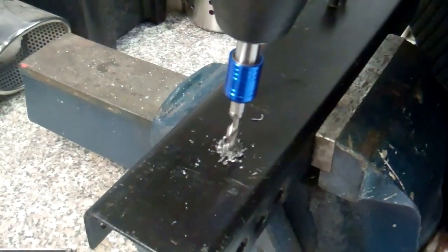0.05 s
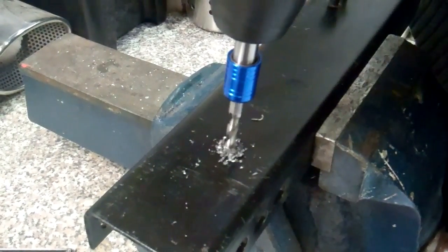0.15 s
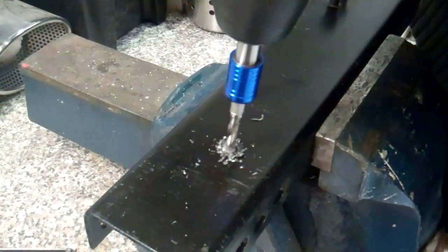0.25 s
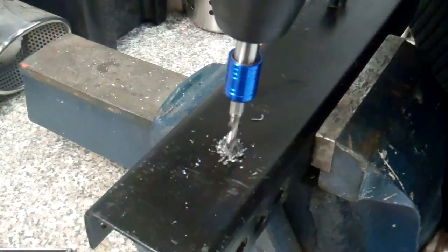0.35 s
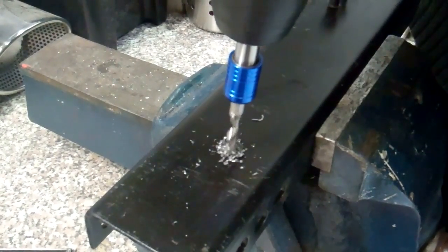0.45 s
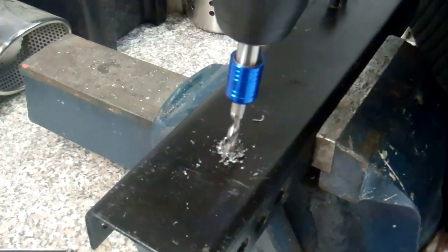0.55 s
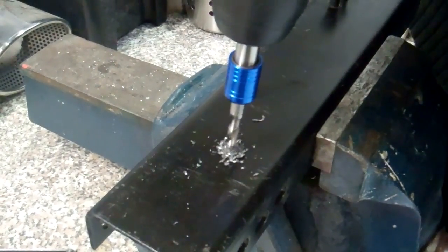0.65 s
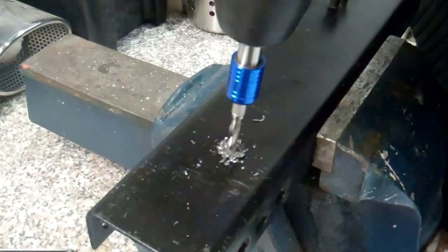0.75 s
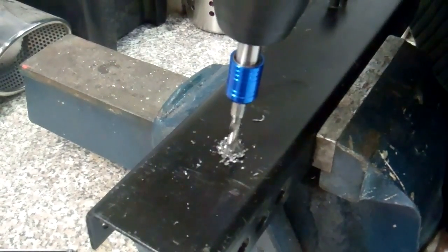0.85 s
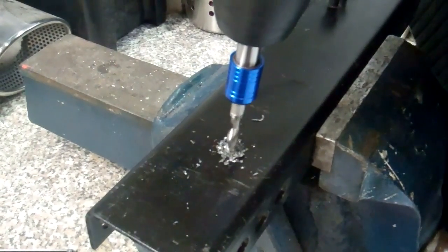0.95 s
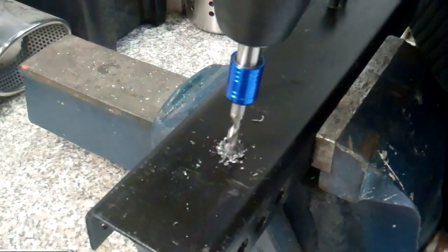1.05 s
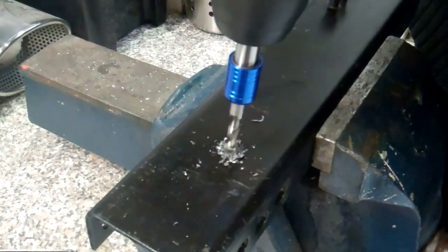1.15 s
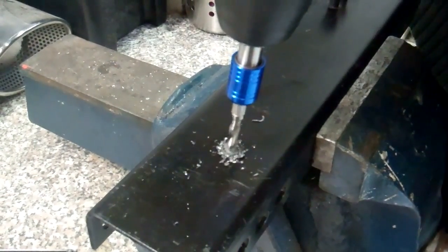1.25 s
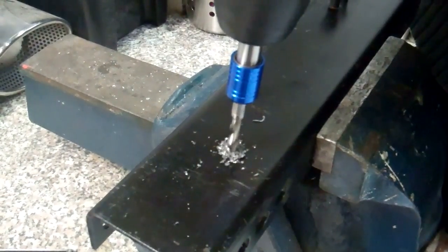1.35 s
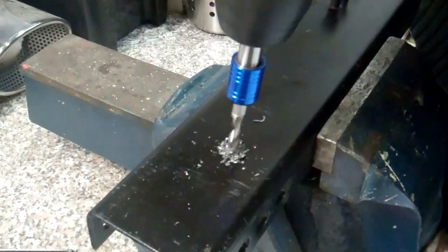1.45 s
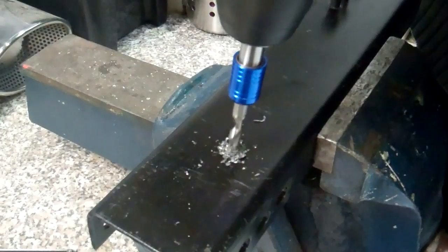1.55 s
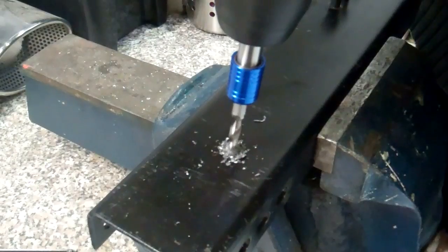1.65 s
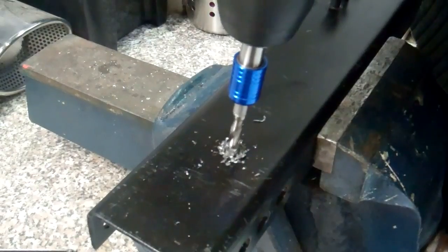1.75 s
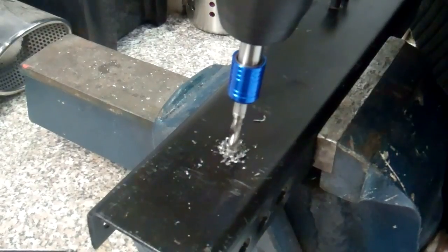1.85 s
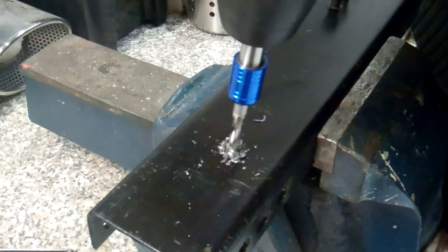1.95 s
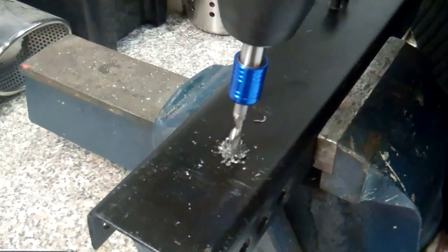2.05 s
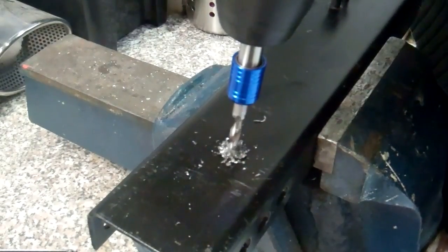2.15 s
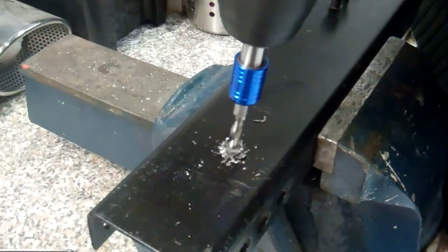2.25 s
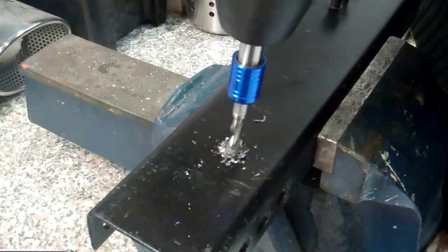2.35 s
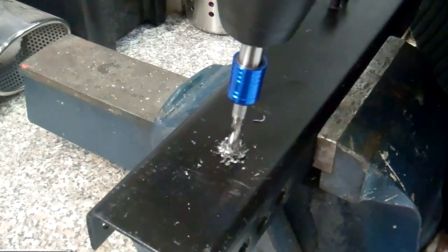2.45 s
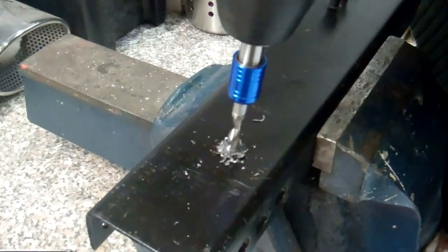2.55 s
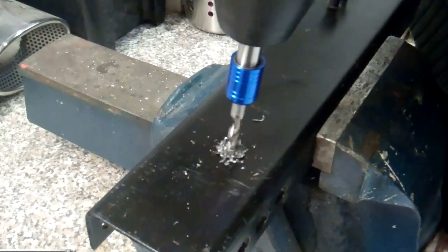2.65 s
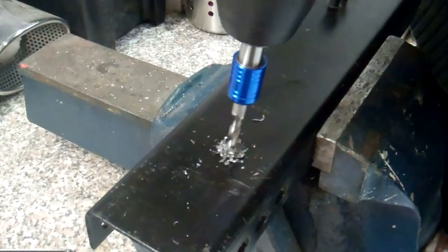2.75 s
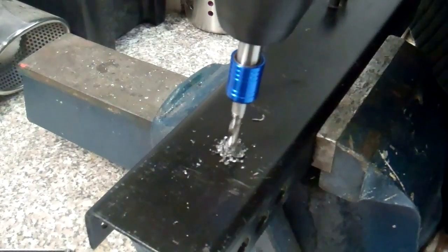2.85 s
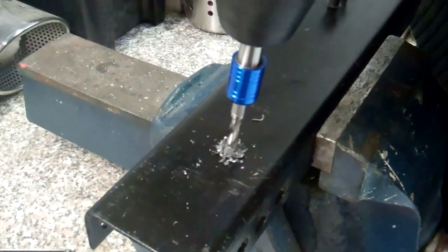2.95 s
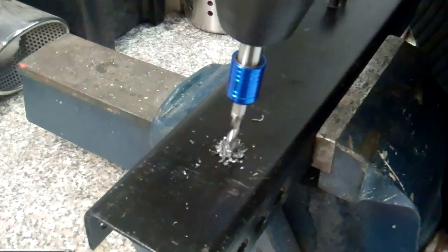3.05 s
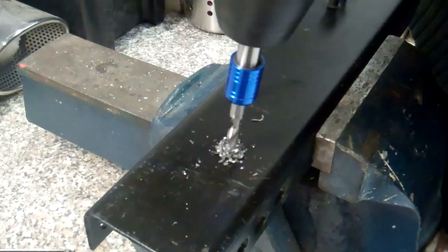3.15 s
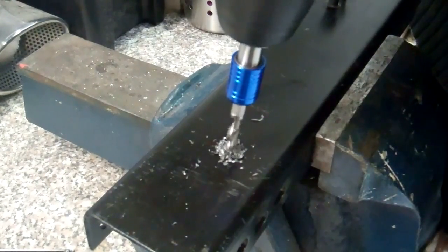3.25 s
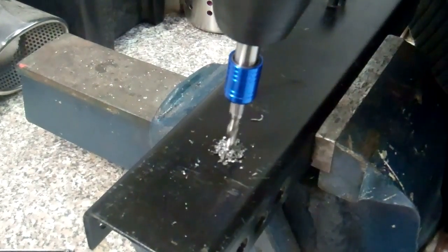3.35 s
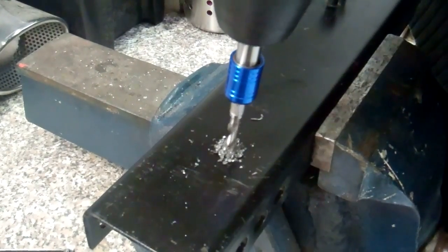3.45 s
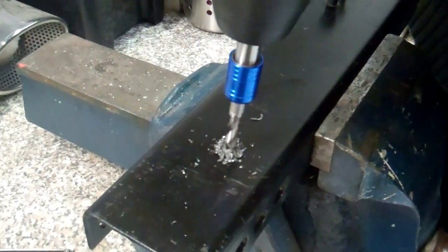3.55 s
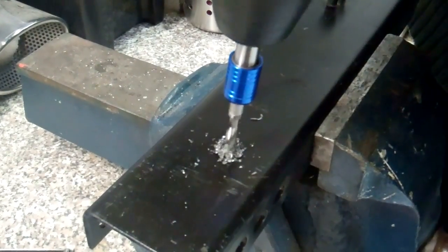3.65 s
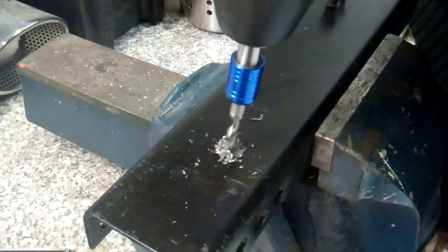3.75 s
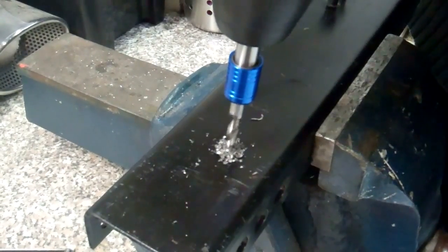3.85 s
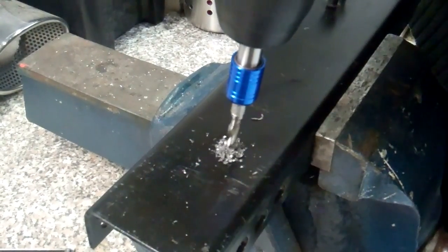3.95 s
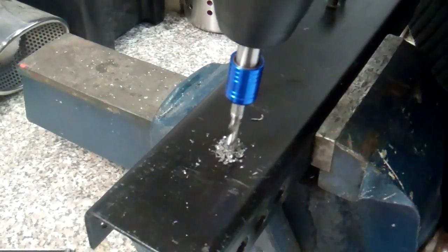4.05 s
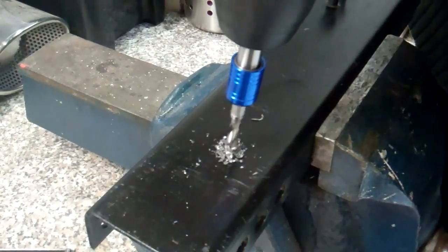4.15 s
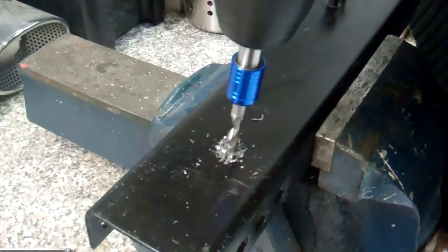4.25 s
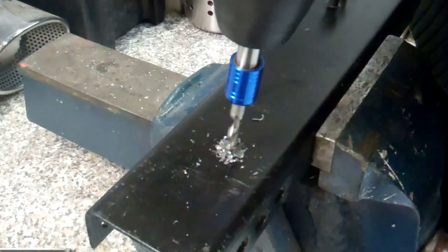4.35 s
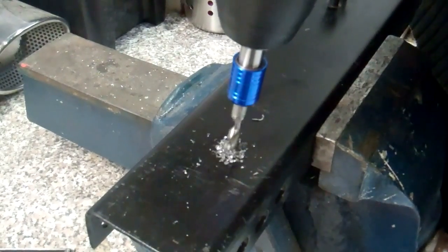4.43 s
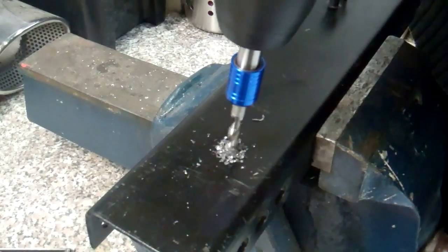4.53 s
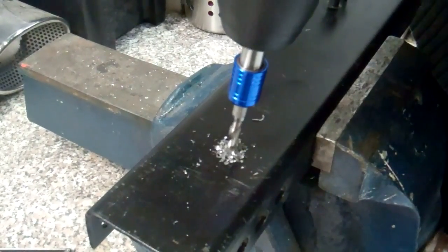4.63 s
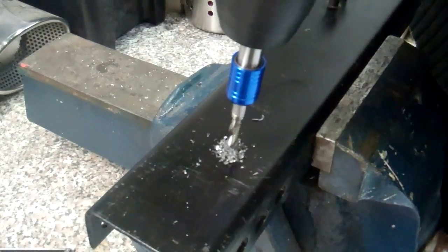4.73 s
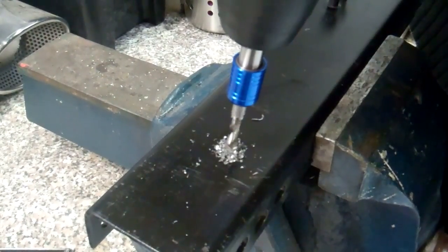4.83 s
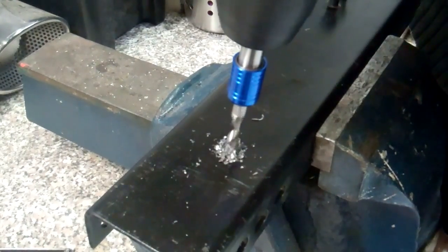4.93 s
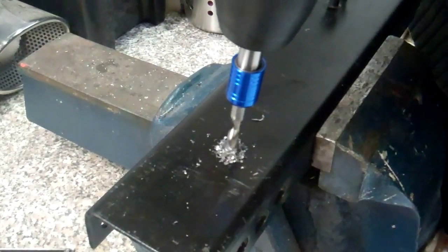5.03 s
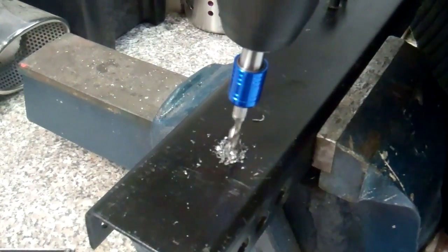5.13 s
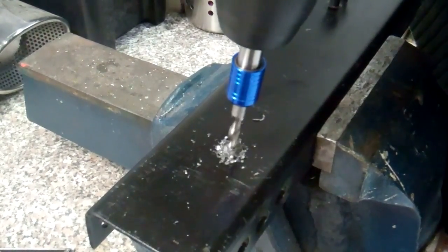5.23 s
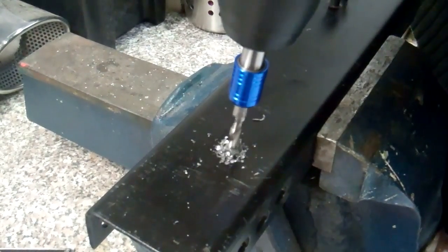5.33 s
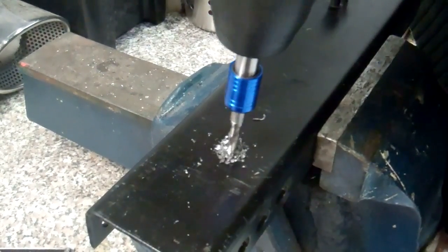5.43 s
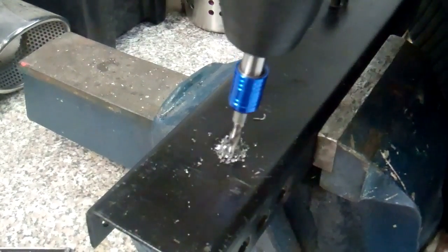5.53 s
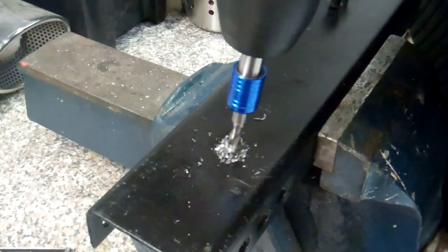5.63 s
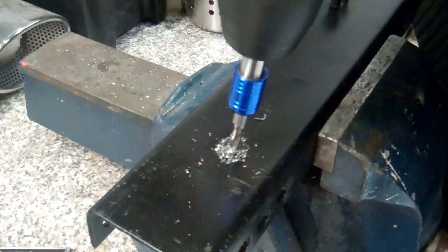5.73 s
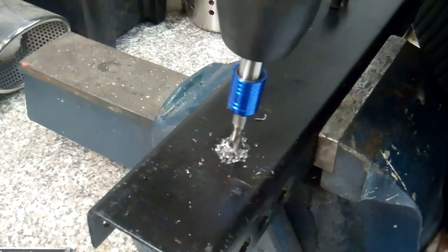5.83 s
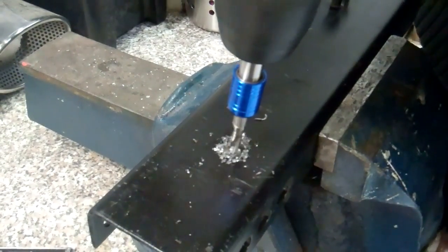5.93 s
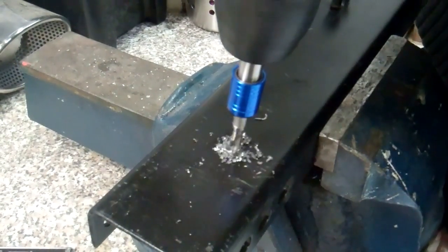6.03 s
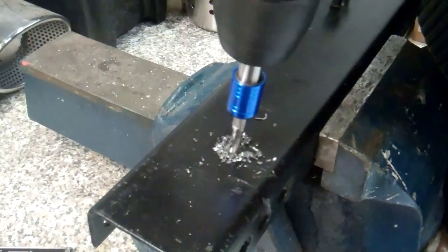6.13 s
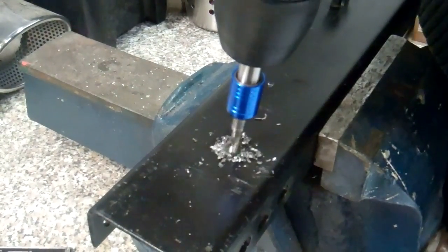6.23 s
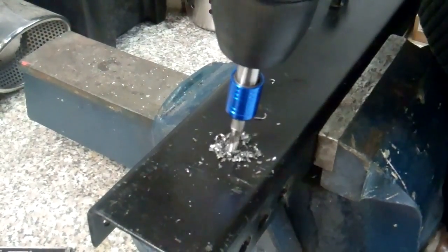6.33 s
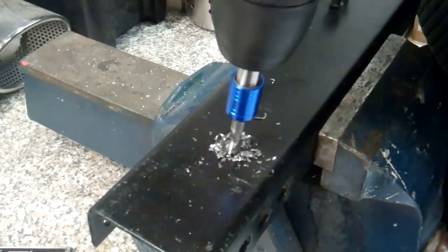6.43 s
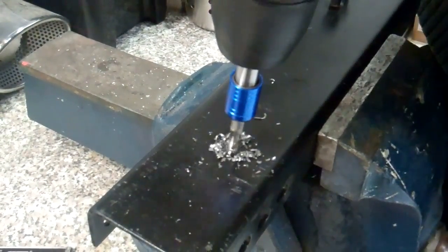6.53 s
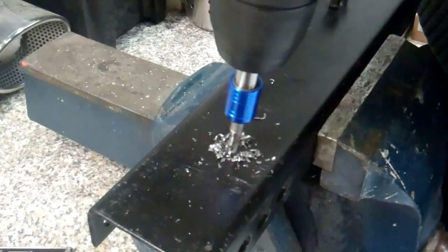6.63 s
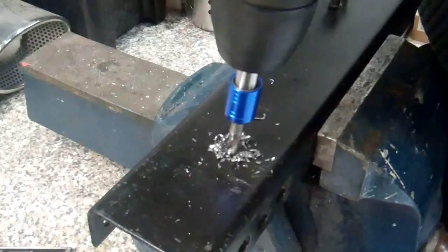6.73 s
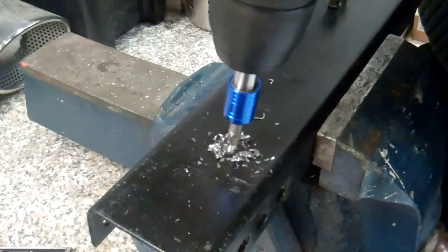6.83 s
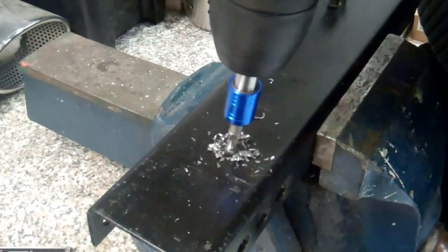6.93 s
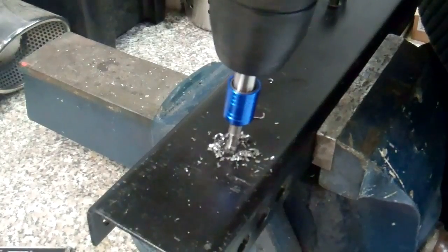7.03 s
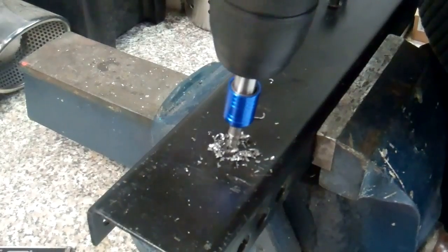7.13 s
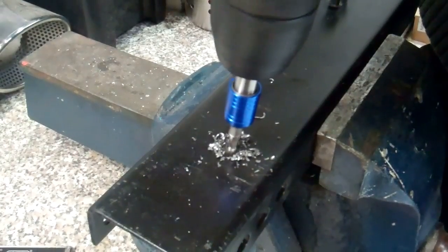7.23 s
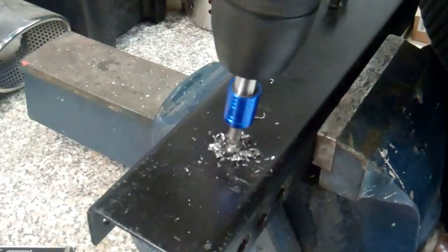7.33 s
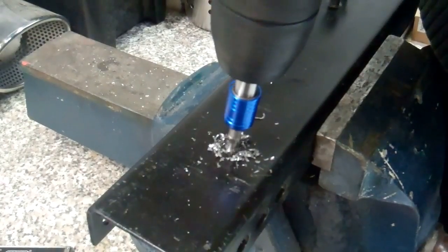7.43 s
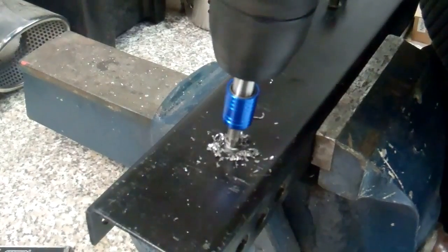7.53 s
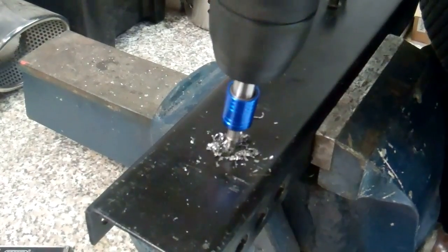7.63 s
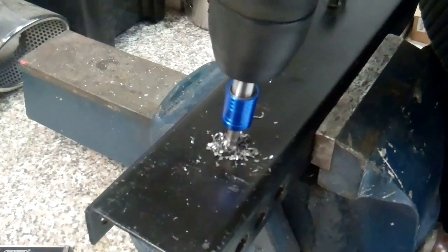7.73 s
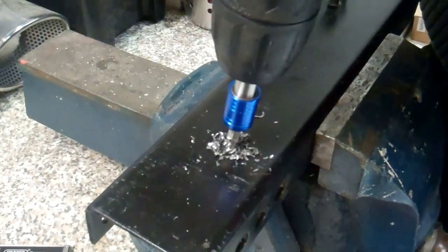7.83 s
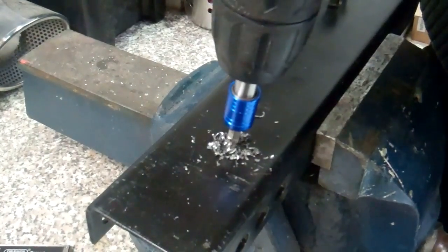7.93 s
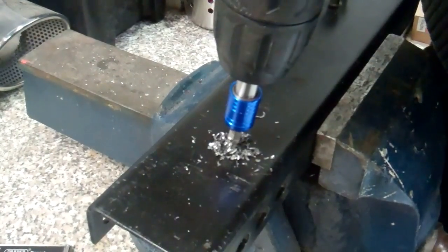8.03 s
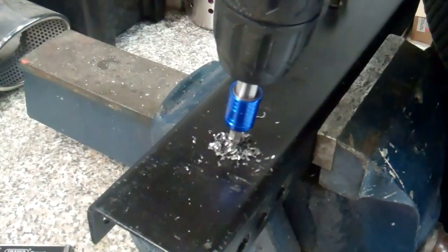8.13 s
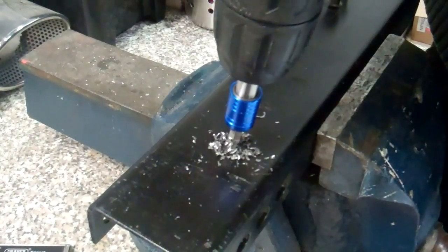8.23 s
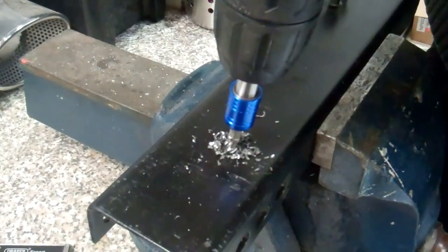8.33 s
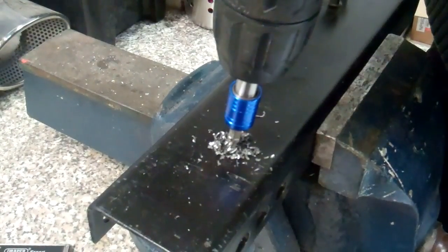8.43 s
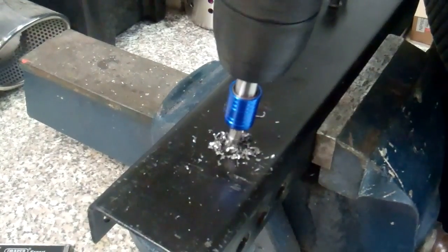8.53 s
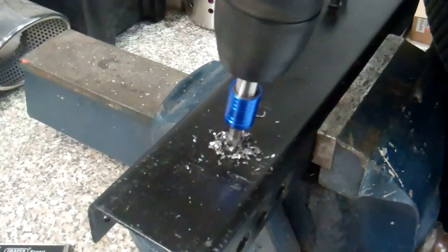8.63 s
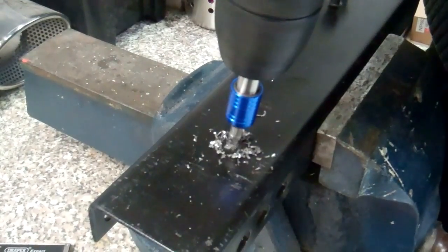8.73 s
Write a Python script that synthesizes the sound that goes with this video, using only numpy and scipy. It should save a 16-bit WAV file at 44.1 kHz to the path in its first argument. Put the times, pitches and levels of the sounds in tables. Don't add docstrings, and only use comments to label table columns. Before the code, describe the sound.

A cordless drill bores steadily into clamped steel, close to the microphone in a workshop: a high motor and fan whine over dense gear rattle and gritty cutting. After five seconds it sags and squeals, then speeds up with pulsing, rasping grabs as the bit breaks through. It stops abruptly. Faint hiss swells in the pause, a direction switch snaps sharply, the trigger clicks and the motor spins up lower.

```python
import sys
import numpy as np
from scipy import signal
from scipy.fft import rfft, irfft, next_fast_len
from scipy.io import wavfile
from scipy.ndimage import uniform_filter1d

SR = 44100
rng = np.random.default_rng(int(sys.argv[2]) if len(sys.argv) > 2 else 0)


def magnitude_from_level(level_db):
    exponent = np.asarray(level_db, float) / 20
    return 10 ** exponent


def master(y):
    cut = np.clip(np.atleast_2d(y).T, -1, 1)
    pcm = np.round(cut * 32767)
    wavfile.write(sys.argv[1], SR, pcm.astype(np.int16))


N = 387198
TIME, SIZE = np.arange(N) / SR, next_fast_len(N)
HZ = np.arange(SIZE // 2 + 1) * SR / SIZE + 1e-3

# (time [s], shaft speed [Hz])
LOADED_SPEED = [(0, 323.9), (3.0, 319.6), (4.5, 316), (5.08, 310.2), (5.3, 304), (5.525, 292), (5.7, 273),
                (5.887, 263.7), (5.985, 282.3), (6.23, 293.5), (6.38, 309.7), (6.53, 324.3), (6.72, 338.3),
                (7.03, 340.8), (7.35, 336), (7.6, 304.8), (7.71, 315), (7.89, 295.8)]
# (time [s], speed loss [Hz])
JAMS = [(1.3, 2.15), (1.94, 3.16), (3.22, 2.04), (3.94, 1.94), (4.27, 4.9), (4.58, 1.9), (4.76, 2.02),
        (5.49, 11), (5.6, 12), (6.1, 8.6), (6.43, 9), (6.607, 5), (6.775, 5.1), (6.949, 5.8), (7.091, 11.4),
        (7.246, 10.8), (7.41, 4.85), (7.87, 4)]
JAM_S, RECOVER_S = 0.045, 0.06
JAM_BLADE_DB_PER_HZ = -0.4
STOP_S, BRAKE_HZ_PER_S, BRAKE_DB_PER_S = 7.895, 1800, 702
EASE_S, EASE_DB_PER_S = 7.835, 300
START_S, KICK_HZ, FREE_HZ, SPIN_UP_S = 8.542, 62, 260.5, 0.09
TIP_S, TIP_FADE_S = 5.78, 0.11

STAGE_ENDS = (3.9, 5.24, 5.78, 6.44, 7.5, 8.2)
STAGE_FADE_S = 0.09
# (unbalance [dB], planet mesh [dB], fan blades [dB], second blade tone [dB])
STAGE_TONES = [
    (-65.5, -48, -48.5, -60),
    (-64, -53.5, -47, -54),
    (-65, -54, -59, -56),
    (-66.5, -54.5, -58.5, -67),
    (-67, -58, -41.5, -62),
    (-64, -55, -39.5, -49),
    (-65, -66, -51, -49),
]
# (vice and bench [dB], cutting edge [dB], gear rattle [dB], cooling air [dB])
STAGE_NOISES = [
    (-51, -47.5, -39.5, -38.5),
    (-51.5, -48, -39, -38.5),
    (-53, -47.5, -38, -39.5),
    (-52.5, -44.5, -37, -41.5),
    (-48.5, -46.5, -39.5, -43),
    (-49, -47, -40.5, -43.5),
    (-46, -45, -37.5, -37.5),
]

PLANET, BLADES = 12.63, 15
UNBALANCE_DB_PER_HZ, RATED_HZ = 0.21, 321.3
PATCHY_DB = 1
GEAR_ORDERS = (.47, .76, 1.35, 1.56, 2.32, 2.58, 3, 3.11, 3.25, 5, 6.5, 9.75, 13.52, 16.25, 19.5, 23, 26)
# (while boring [dB], after breaking through [dB])
GEAR_LEVELS = [(-90.5, -86.5), (-85, -95), (-74.5, -74), (-71.5, -72), (-68, -70.5), (-67.5, -68),
               (-74, -59), (-68.5, -79), (-65, -61), (-64.5, -89), (-59.5, -56), (-57, -59), (-58, -67.5),
               (-74, -55), (-56, -69), (-66, -72.5), (-54.5, -71)]
# (start [s], length [s], level [dB])
SQUEALS = [
    (5.311, 0.064, -43),
    (5.422, 0.062, -36.5),
    (5.53, 0.087, -37),
    (5.69, 0.13, -42.5),
    (5.809, 0.12, -38.5),
    (5.994, 0.309, -36),
    (6.319, 0.023, -41),
    (6.375, .05, -42),
]
SQUEAL_EDGE_S = 0.01
# (time [s], swell [dB])
SWEPT = [
    (8.63, 9),
    (8.7, 12),
]
SWEPT_S = 0.022

# (time [s], level [dB])
FEED = [(0, -0.5), (.06, 1), (.6, -1), (1.14, 1), (1.2, -1.5), (1.86, .5), (1.95, -3.5), (2.3, -0.5),
        (3.05, 1.5), (3.32, -1), (3.55, 0), (5.14, 0), (5.21, -2), (5.5, 0.5), (5.66, -2), (5.85, 0.5),
        (6.33, -.5), (6.52, -1.5)]
FEED_BACK_S = 6.65
# (time [s], level [dB])
GRABS = [(5.84, 1), (6.05, 1), (6.22, 1), (6.41, 1.5), (6.57, 2.5), (6.74, 3.5), (6.91, 6), (7.06, 5.5),
         (7.23, 6), (7.39, 5.5), (7.57, 2.5), (7.76, 4.5)]
GRAB_S = 0.037
GRAB_SHARE = (0.14, 0.39, 0.44, .6)
RESTART_LAG = (0, 5, 13, 17)
LAG_S, INRUSH_S = 0.033, 0.03
# (time [s], level [dB])
INRUSH = [
    (8.61, 1.9),
]
BAND_EDGES = (1400, 3000, 6500)
# (frequency [Hz], width [Hz], level [dB])
STEEL = [(2130, 400, -44), (3200, 150, -47), (3880, 260, -41)]
# (frequency [Hz], width [Hz], level [dB])
CASE = [(984, 77, 5), (1935, 380, 2.5), (3630, 71, 3), (3950, 750, 1.5), (6140, 60, -2), (7500, 390, 1.5),
        (8350, 170, -1)]
# (frequency [Hz], density [dB per Hz])
UPRIGHT = [(120, -39), (380, -27), (490, -17.5), (620, -18), (1000, -14.5), (1200, -14), (2030, -2.5),
           (3000, -1.5), (4160, -0.5), (4500, -4), (5200, -3.5), (6800, -9), (7400, -4.5), (9500, -10)]
# (frequency [Hz], density [dB per Hz])
TIPPED = [(120, -46), (390, -29.5), (450, -19), (830, -14), (1200, -15.5), (2110, -7), (2740, -8.5),
          (3760, -2.5), (4500, -3), (5600, -6.5), (6800, -13.5), (9400, -13.5), (10500, -15.5),
          (11200, -22.5)]

# (time [s], peak [dB], frequency [Hz], 60 dB decay [s])
KNOCKS = [(3.42, -63, 138, .15), (5.495, -60, 125, 0.13), (5.53, -60, 176, .1), (5.6, -63.5, 128, 0.66),
          (8.543, -37, 540.3, 0.08), (8.585, -40, 574, 0.094), (8.6, -36, 686, 0.087),
          (8.65, -40, 566, 0.068), (8.595, -36, 4260, .1), (8.625, -34, 3950, .07), (8.695, -37, 5780, .08),
          (8.735, -35, 5730, 0.083), (8.765, -40, 5720, 0.057)]
# (time [s], peak [dB], centre [Hz], 60 dB decay [s])
CLICKS = [
    (7.875, -25, 5000, 0.011),
    (7.947, -58, 6830, .008),
    (7.977, -60, 5100, 0.0082),
    (8.206, -33, 7500, 0.016),
    (8.2867, -19.5, 5530, 0.014),
    (8.2907, -16.5, 6450, 0.0085),
    (8.519, -49.5, 3000, 0.028),
    (8.5435, -34, 5000, 0.015),
    (8.568, -19.5, 5000, 0.011),
]
# (time [s], peak [dB], frequency [Hz], 60 dB decay [s])
SNAPS = [
    (8.2863, -18.5, 2880, .0035),
    (8.2868, -23, 8500, .004),
    (8.2864, -32, 665, 0.016),
    (8.2868, -34, 1430, .008),
    (8.2905, -18.5, 3900, 0.0024),
    (8.2906, -22, 6800, .003),
]
# (time [s], level [dB])
SLIDE = [(8.2, -91), (8.23, -62), (8.28, -66), (8.29, -83)]
ECHO_DB = -41

# (time [s], level [dB])
GAIN = [(7.95, -64), (8.02, -75.5), (8.09, -62), (8.19, -61.5), (8.28, -55.5), (8.3, -83), (8.37, -77),
        (8.44, -86), (8.52, -63.5)]
# (frequency [Hz], density [dB per Hz])
ROOM = [(120, -24), (200, -8.5), (248, -12.5), (280, -9), (360, -6.5), (504, -8), (815, -7.5),
        (8660, -15.5), (14000, -42)]
# (frequency [Hz], density [dB per Hz])
LOW = [(12, -42), (20, -12.5), (27, -5), (70, -8), (97, -13.5), (157, -4.5), (200, -16), (260, -41),
       (440, -120)]
RUMBLE_DB, DRILLING_DB = -8.5, -15
HUM_HZ, HUM_DB = 150.5, -1
# (time [s], rumble [dB])
LURCHES = [
    (0, 4),
    (5.51, 17),
    (6.1, -10.5),
]
LURCH_S, SETTLE_S = 0.03, 0.2

# (frequency [Hz], correlation [-1 to 1])
LIKENESS = [(30, .5), (125, .82), (250, .94), (500, .98), (1000, .96), (2000, .925), (4000, .82),
            (8000, .75), (10500, .5), (12500, -.2)]
# (frequency [Hz], left minus right [dB])
PAN_UPRIGHT = [(30, 0), (250, -4), (1000, -1.5), (2500, 0), (3500, -1), (4700, -3.5), (6500, 1), (7400, 3),
               (8500, 11.5), (10300, 7), (11500, 1.5)]
# (frequency [Hz], left minus right [dB])
PAN_TIPPED = [(30, -1.5), (250, -3.5), (1000, -0.5), (2500, -1), (4700, -2.5), (6500, -1.5), (8500, 8.5),
              (11500, 4.5)]
# (frequency [Hz], level [dB])
MIC = [(9000, -0.5), (10000, -5), (11600, -9), (12000, -16.5), (12300, -28), (12500, -9.5), (13000, -15.5),
       (14150, -19), (14450, -59)]


def shaft_speed():
    cutting = curve(LOADED_SPEED) - bumps(JAMS, JAM_S, RECOVER_S)
    cutting -= BRAKE_HZ_PER_S * np.maximum(TIME - STOP_S, 0)
    spin_up = FREE_HZ - (FREE_HZ - KICK_HZ) * restart_decay(SPIN_UP_S)
    return np.where(TIME < START_S, np.maximum(cutting, 0), spin_up)


def restart_decay(seconds):
    return np.exp(-np.abs(TIME - START_S) / seconds)


def power_db():
    braked = -np.clip((TIME - STOP_S) * BRAKE_DB_PER_S, 0, 70)
    return np.where(TIME < START_S, braked, 0)


def tone_levels(shaft_hz):
    boring = TIME < START_S
    easing_off = np.clip((TIME - EASE_S) * EASE_DB_PER_S, 0, 70)
    loss = np.where(boring, easing_off, 40 * restart_decay(LAG_S))
    shaft, planet, blade, twice = staged(STAGE_TONES) + power_db()

    squeal = np.zeros(N)
    for start, length, db in SQUEALS:
        from_edge = np.minimum(TIME - start, start + length - TIME)
        squeal += magnitude_from_level(db) * np.clip(from_edge / SQUEAL_EDGE_S + 0.5, 0, 1)
    planet = 20 * np.log10(magnitude_from_level(planet + PATCHY_DB * walk(10)) + squeal) - loss

    blade = blade - loss - JAM_BLADE_DB_PER_HZ * bumps(JAMS, JAM_S, JAM_S) + 0.78 * walk(10)
    shaft = shaft + np.where(boring, UNBALANCE_DB_PER_HZ * (shaft_hz - RATED_HZ), -loss)
    twice = twice - loss + bumps(SWEPT, SWEPT_S, SWEPT_S)
    return shaft, planet, blade, twice


def whine(turns, shaft_hz, tipped):
    def tone(order, db, flutter_db=1.3):
        level = magnitude_from_level(db + flutter_db * walk(60) + 1.06 * walk(25))
        phase = 2 * np.pi * order * turns + order / BLADES * 0.4 * walk(40)
        return np.sqrt(2) * level * np.sin(phase)

    shaft_db, planet_db, blade_db, twice_db = tone_levels(shaft_hz)
    out = tone(1, shaft_db, flutter_db=0.7)
    out += tone(PLANET, planet_db, flutter_db=2.5)
    out += tone(BLADES, blade_db) + tone(2 * BLADES, twice_db)
    out += tone(BLADES + 1, blade_db - 12, flutter_db=4.0)
    out += tone(2 * BLADES + 1, twice_db - 6)
    out += tone(2 * PLANET, planet_db - 21)
    out += tone(PLANET + 0.385, np.minimum(planet_db - 2.5, -50), flutter_db=3.5)
    running_db = np.minimum(shaft_db + 69.0, 0)
    for order, (boring_db, through_db) in zip(GEAR_ORDERS, GEAR_LEVELS):
        db = boring_db + tipped * (through_db - boring_db)
        out += tone(order, db + running_db, flutter_db=4.5)
    return out


def noise_levels():
    lag = (TIME >= START_S) * restart_decay(LAG_S)
    feed_db = curve(FEED + [(FEED_BACK_S, 0)])
    shared = feed_db + power_db() + bumps(INRUSH, INRUSH_S, INRUSH_S)
    return staged(STAGE_NOISES) + shared - np.array(RESTART_LAG)[:, None] * lag


def rattle(turns, tipped):
    pulse = 1 + 0.13 * np.cos(2 * np.pi * turns) + 0.024 * np.cos(2 * np.pi * 0.43 * turns)
    uneven = magnitude_from_level(1.6 * np.minimum(rng.exponential(size=N), 4) + 1.0 * walk(300))
    pair = ports(*(pulse * uneven * rng.standard_normal((2, N))))
    pair *= magnitude_from_level(sum(db * mode(hz, width) for hz, width, db in CASE))
    grab_db = bumps(GRABS, GRAB_S, GRAB_S)

    steel = sum(magnitude_from_level(db) * unit(heard(pair, mode(hz, width), PAN_TIPPED)) for hz, width, db in STEEL)
    out = grab_db / 7 * steel

    below = [1 / (1 + (HZ / edge) ** 12) for edge in BAND_EDGES]
    bands = np.diff([0 * HZ, *below, 1 + 0 * HZ], axis=0)
    for band, db, grip in zip(bands, noise_levels(), GRAB_SHARE):
        before = unit(heard(pair, np.sqrt(band) * magnitude_from_level(over_hz(UPRIGHT)), PAN_UPRIGHT))
        after = unit(heard(pair, np.sqrt(band) * magnitude_from_level(over_hz(TIPPED)), PAN_TIPPED))
        level = magnitude_from_level(db + grip * grab_db + 0.2 * walk(20) + 0.3 * walk(120))
        out = out + level * (before + tipped * (after - before))
    return out


def knocks():
    return ring(KNOCKS, lambda t, hz: np.sin(2 * np.pi * hz * t) * (1 - np.exp(-t / 0.0021)))


def switch():
    def snap(t, hz):
        return np.sin(2 * np.pi * hz * t) * (1 - np.exp(-t / 0.00016))

    def burst(t, hz):
        return band_noise(len(t), hz * 0.22, min(hz * 1.5, 11000))

    scrape = magnitude_from_level(curve(SLIDE)) * unit(band_noise(N, 3800, 4700))
    direct = ring(SNAPS, snap) + ring(CLICKS, burst) + scrape
    decay = np.exp(-np.log(1000) * np.arange(3000) / SR / 0.06)
    echo = rng.standard_normal((2, 3000)) * decay
    return direct + magnitude_from_level(ECHO_DB) * signal.fftconvolve(direct[None], echo, axes=1)[:, :N]


def room():
    low, high = [ports(*rng.standard_normal((2, N))) for _ in range(2)]
    rumble = unit(heard(low, magnitude_from_level(over_hz(LOW)), PAN_UPRIGHT))
    rumble = rumble + magnitude_from_level(HUM_DB) * np.sin(2 * np.pi * HUM_HZ * TIME)
    hiss = unit(heard(high, magnitude_from_level(over_hz(ROOM)), PAN_TIPPED))
    drilling = np.clip((STOP_S - TIME) / 0.1 + 1, 0, 1)
    rumble_db = RUMBLE_DB + DRILLING_DB * drilling + bumps(LURCHES, LURCH_S, SETTLE_S)
    return magnitude_from_level(curve(GAIN)) * (magnitude_from_level(rumble_db) * rumble + hiss)


def curve(rows):
    s, value = np.transpose(rows)
    return np.interp(TIME, s, value)


def bumps(rows, rise_s, fall_s):
    return sum(h * np.exp(-((TIME - s) / np.where(TIME < s, rise_s, fall_s)) ** 2) for s, h in rows)


def staged(rows):
    steps = np.clip((TIME - np.array(STAGE_ENDS)[:, None]) / STAGE_FADE_S + 0.5, 0, 1)
    return np.array(rows[0])[:, None] + np.diff(rows, axis=0).T @ steps


def walk(rate):
    hold = int(SR / rate)
    steps = np.repeat(rng.standard_normal(N // hold + 1), hold)
    return unit(uniform_filter1d(uniform_filter1d(steps, hold), hold)[:N])


def unit(x):
    return x / np.sqrt(np.mean(np.atleast_2d(x).mean(axis=0) ** 2))


def ring(rows, shape):
    out, t = np.zeros(N + SR), np.arange(SR // 2) / SR
    for s, peak_db, hz, t60 in rows:
        body = shape(t, hz) * np.exp(-np.log(1000) * t / t60)
        out[int(s * SR):][:len(t)] += magnitude_from_level(peak_db) * body / np.abs(body).max()
    return out[:N]


def band_noise(length, low_hz, high_hz):
    band = signal.butter(2, [low_hz, high_hz], "band", fs=SR, output="sos")
    return signal.sosfilt(band, rng.standard_normal(length))


def mode(hz, width):
    return 1 / (1 + (2 * (HZ - hz) / width) ** 2)


def over_hz(points):
    hz, value = np.transpose(points)
    return np.interp(np.log(HZ), np.log(hz), value)


def ports(common, other):
    like = np.clip(over_hz(LIKENESS), -1, 1)
    shared = np.sqrt(1 + like) * rfft(common, SIZE)
    unrelated = np.sqrt(1 - like) * rfft(other, SIZE)
    return shared + unrelated * np.array([[1], [-1]])


def heard(pair, gain, pan):
    shade = magnitude_from_level(over_hz(pan) * np.array([[0.5], [-0.5]]))
    return irfft(pair * gain * shade, SIZE)[:, :N]


def scene():
    shaft_hz = shaft_speed()
    turns = np.cumsum(shaft_hz + 0.893 * walk(12)) / SR
    tipped = np.clip((TIME - TIP_S) / TIP_FADE_S + 0.5, 0, 1)
    close = whine(turns, shaft_hz, tipped) + knocks()
    drill = heard(rfft(close, SIZE)[None], 0.98, PAN_TIPPED)
    return drill + rattle(turns, tipped) + switch() + room()


def low_pass(x):
    return signal.sosfilt(signal.butter(12, 14380, fs=SR, output="sos"), x)


def record(dry):
    mix = irfft(rfft(dry, SIZE) * magnitude_from_level(over_hz(MIC)), SIZE)[:, :N]
    return low_pass(mix)


dry = scene()
out = record(dry)
master(out)
```